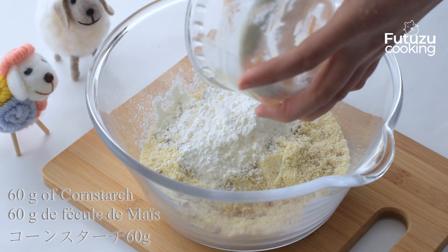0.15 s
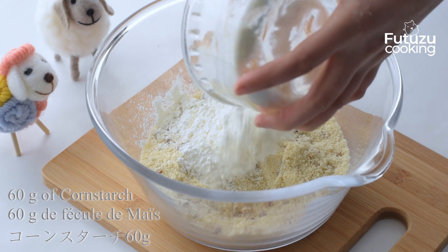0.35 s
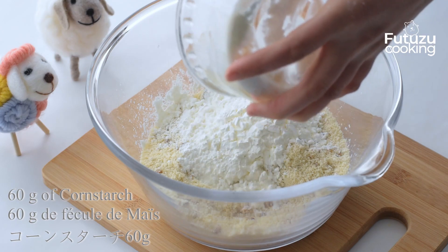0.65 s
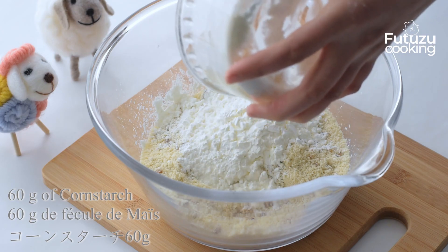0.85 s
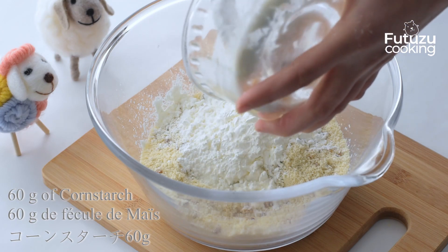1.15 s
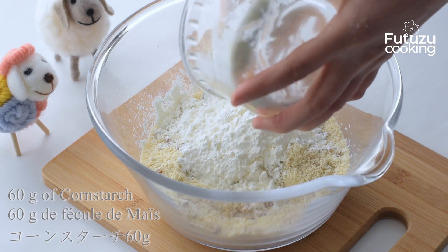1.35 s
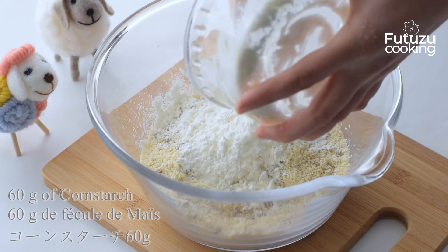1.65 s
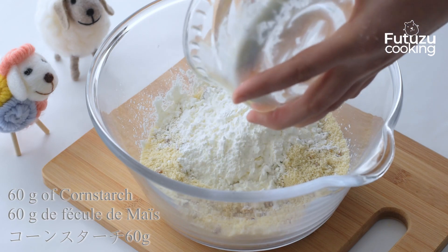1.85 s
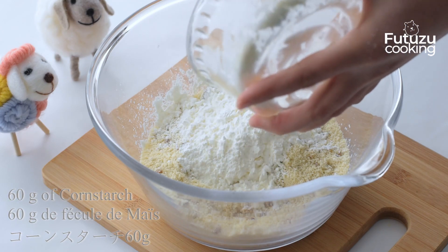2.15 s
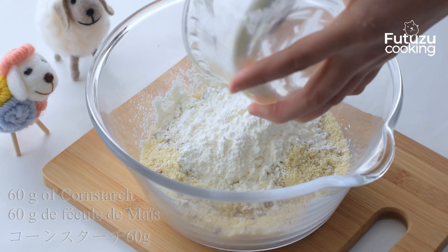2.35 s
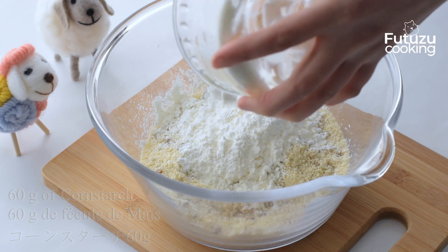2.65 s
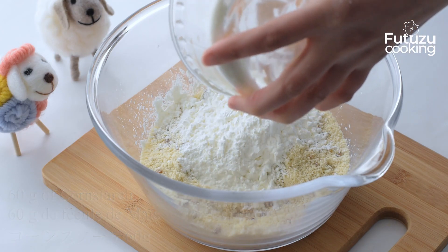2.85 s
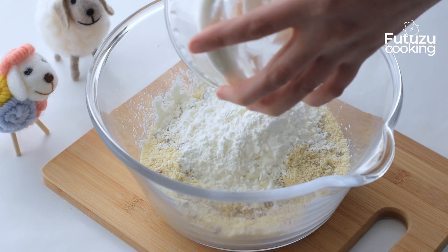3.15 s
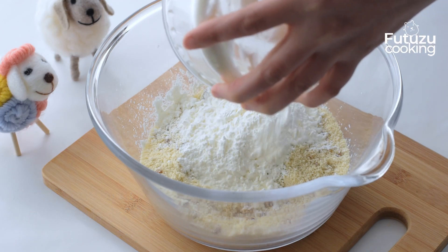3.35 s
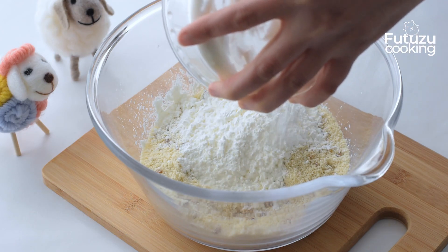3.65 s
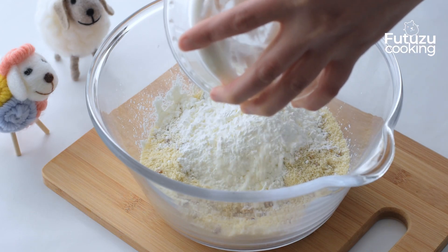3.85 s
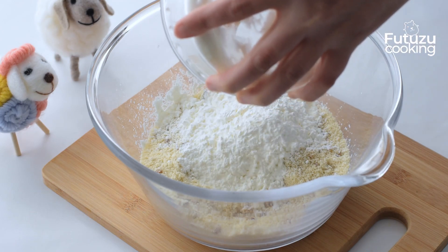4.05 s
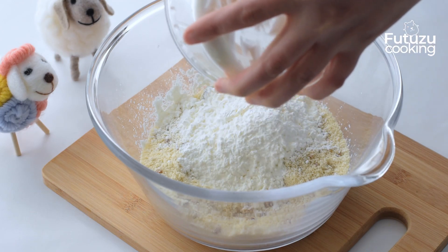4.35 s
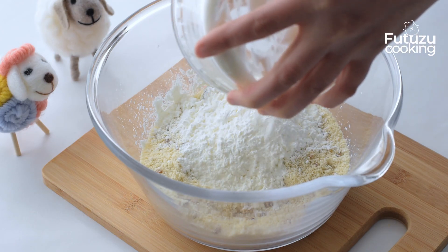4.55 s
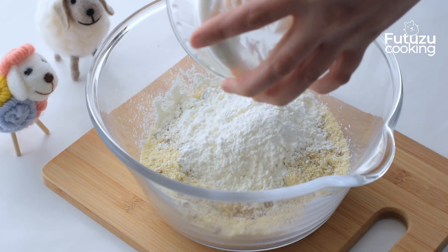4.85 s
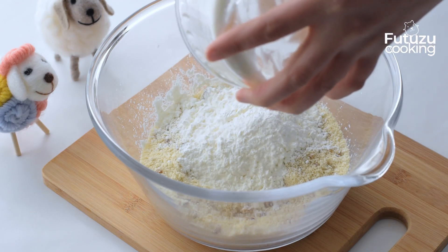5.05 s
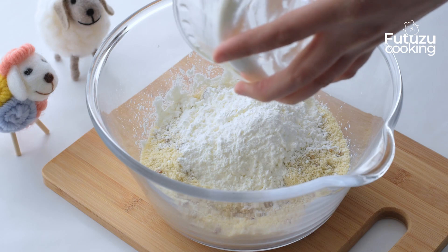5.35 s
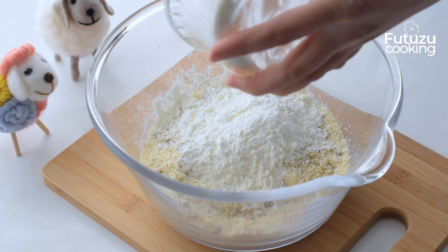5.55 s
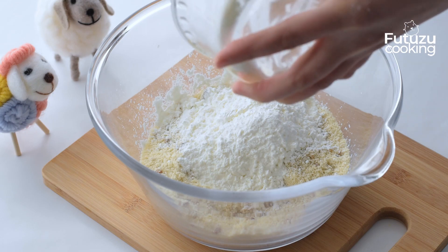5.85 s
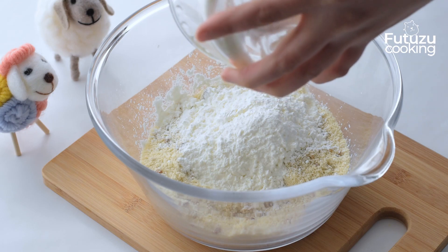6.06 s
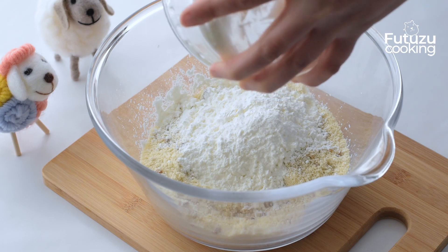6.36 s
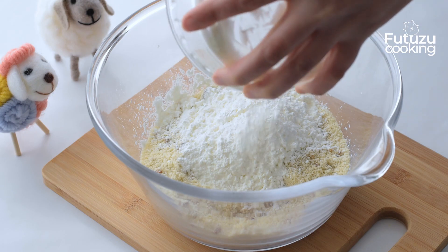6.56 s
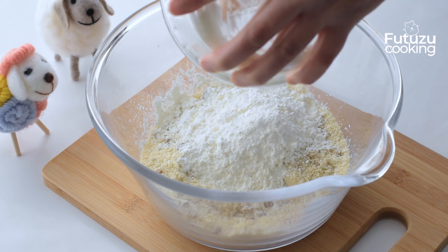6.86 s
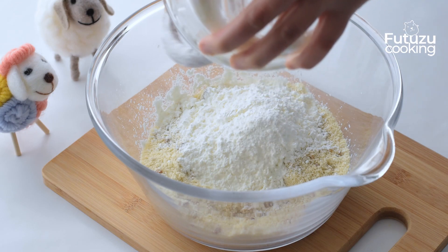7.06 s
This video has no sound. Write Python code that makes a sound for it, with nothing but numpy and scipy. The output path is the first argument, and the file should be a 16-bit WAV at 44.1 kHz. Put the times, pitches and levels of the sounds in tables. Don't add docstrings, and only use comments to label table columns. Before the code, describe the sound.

Near the microphone, wood meets glass with dull knocks, faint scrapes and short, damped rings, the strongest bright clinks arriving late. The kitchen answers briefly. Outside, a rising trill accelerates during the opening, then another song of quick swooping whistles and chirps follows with airy echoes. Low distant traffic, slight floor rumble and light microphone hiss lie underneath.

```python
import sys
import numpy as np
from scipy import signal
from scipy.fft import rfft, irfft, next_fast_len
from scipy.io import wavfile
from scipy.ndimage import uniform_filter1d, map_coordinates

SR = 44100
rng = np.random.default_rng(int(sys.argv[2]) if len(sys.argv) > 2 else 0)


def amplitude_ratio(level_db):
    exponent = np.asarray(level_db, float) / 20
    return 10 ** exponent


def bounce(signal):
    frames = np.transpose(np.atleast_2d(signal))
    limited = np.clip(frames, -1, 1)
    pcm = np.round(limited * 32767).astype(np.int16)
    wavfile.write(sys.argv[1], SR, pcm)


N = 317520

# start in seconds, peak in dB, low edge in Hz,
# high edge in Hz.
KNOCKS = [(0.0634, -16, 305, 1030), (.108, -18.5, 358.7, 1450), (0.541, -41, 250, 704),
          (1.175, -35, 700, 1720), (1.83, -26.5, 585, 1780), (2.389, -13, 840, 2660),
          (2.852, -23, 302, 1010), (3.04, -25.5, 200, 1100), (3.491, -22.5, 250, 1500),
          (4.372, -32.5, 600, 1900), (4.785, -22, 150, 1250), (5.2265, -4, 1330, 5400),
          (5.224, -51, 100, 457), (5.956, -29, 1200, 2100), (6.079, -41.5, 150, 500),
          (6.168, -10.5, 1100, 2490), (6.828, -5, 760, 3740)]
# pitch in Hz, width in Hz, level in dB.
SPOON = [(500, 150, -6), (983, 71, -82.5), (1421.6, 1100, 11), (2050, 500, -5), (3050, 400, -16.5)]
# start in seconds, level in dB,
# tilt in dB per octave, pitch factor under the grip, seconds until the fingers close.
RINGS = [(0.11, -23, -18.5, 1.005, 0.017), (.11, -26.5, -27, .93, 0.035), (1.176, -25, -22, 0.98, 0.0077),
         (1.194, -30, -27, .99, 0.039), (1.831, -23.5, -22.5, .993, 0.044), (2.4, -14.5, -23, 0.97, 0.013),
         (2.436, -35, -24, 0.95, 0.03), (3.042, -36.5, -13, 0.98, 0.026), (3.493, -20.5, -23, 0.985, 0.027),
         (4.37, -20, -36, 0.99, 0.03), (5.225, -11, -1.8, 1, 0.021), (5.955, -33.5, -14.5, 1.02, 0.013),
         (6.168, -7.5, -21.5, 1, 0.023), (6.197, -22, -28.5, 1.001, 0.023),
         (6.828, -7.5, -11.5, 1.008, 0.0085)]
# start in seconds, level in dB, favoured Hz,
# pitch factor under the grip, seconds until the fingers close.
SPOT_RINGS = [(1.832, -58, 2700, 1.1, 0.069), (2.409, -35.5, 2700, .99, 0.044),
              (5.228, -22, 4650, .996, 0.052), (6.831, -17.5, 4650, 1.006, 0.029)]
# pitch in Hz, split in Hz, level of the partner
# in dB, seconds to fall 60 dB in the hand.
DISH_MODES = [
    (1199.3, 13, -14.5, 0.2),
    (2700, 23, -7, 0.27),
    (4650, 55, -2, 0.11),
]
# start in seconds, length in seconds, level in dB, favoured Hz.
GRAZES = [(3.038, 0.0053, -64, 6500), (3.41, .11, -70, 6930), (4.14, 0.018, -66, 5200),
          (4.161, 0.027, -54, 5100), (4.368, .01, -74, 6900), (4.96, 0.063, -70, 4620),
          (5.228, 0.018, -58.5, 5012), (6.519, 0.036, -53.5, 4950), (6.827, 0.0031, -32.5, 4230)]
# pitch in Hz, width in Hz.
HIGH_RIM = [(3972, 17), (4620, 47), (6930, 84)]
# frequency in Hz, seconds to fall 60 dB.
KITCHEN = [(200, 0.081), (1200, 0.29), (4000, 0.32), (10000, 0.1)]

# time in seconds, start in Hz,
# top in Hz, bend (a plain power), level in dB.
TRILL = [(.04, 6720, 8150, 0.24, -51), (.57, 4130, 7830, 0.38, -49), (1.7, 3876, 7550, 0.86, -44.5),
         (2.1, 3780, 7390, 0.89, -45), (2.44, 3810, 7030, 0.85, -50)]
# time in seconds, syllables sung so far.
TRILL_PACE = [(.04, 0), (.22, 1), (.35, 2), (1.0, 8), (1.29, 11), (1.53, 14), (2.44, 27)]
# frequency in Hz, seconds to fall 60 dB.
HEDGE = [(4000, 1), (9000, 0.77)]

# start in seconds, length in seconds,
# start in Hz, end in Hz, level in dB. The next three tables have the same columns.
SWOOPS = [(4.746, .1, 7250, 7430, -50.5), (4.933, 0.081, 6900, 7164, -46)]
# start and length in seconds, start and end in Hz, dB.
DIVES = [(5.195, 0.048, 4730, 4550, -44), (5.452, .036, 7700, 7150, -44.5), (5.72, .055, 4375, 3960, -41.5),
         (6.18, 0.14, 4680, 4755, -43)]
# start and length in seconds, start and end in Hz, dB.
FLICKS = [(4.1, .16, 3340, 3410, -51.5), (5.553, .021, 7940, 7400, -47), (5.775, .047, 4690, 4375, -43.5),
          (5.83, .08, 4164, 3970, -46.5)]
# start and length in seconds, start and end in Hz, dB.
GLIDES = [(.75, 0.16, 2092, 2216, -66), (4.184, .006, 11700, 9500, -56), (4.275, 0.054, 3420, 3570, -58),
          (4.365, 0.017, 2640, 2630, -59), (4.48, .1, 3860, 3880, -64), (4.53, 0.047, 2750, 2580, -60),
          (4.755, 0.096, 7800, 7950, -51.5), (5.33, .1, 3800, 5020, -53), (5.49, 0.026, 5870, 6200, -57.5),
          (5.497, 0.025, 8040, 8900, -44), (5.525, 0.017, 8900, 7750, -41), (5.62, .18, 3050, 2850, -66.5),
          (5.635, .045, 5400, 4500, -52.5), (5.638, 0.02, 5440, 7470, -51.5),
          (6.028, 0.18, 4030, 4050, -56), (6.082, .05, 5950, 5700, -56), (6.31, .042, 4050, 3100, -52.5),
          (6.19, 0.034, 5300, 4440, -47), (6.36, 0.05, 3690, 2880, -55), (6.485, 0.026, 3770, 3620, -42),
          (6.52, 0.04177, 3710, 4200, -46), (6.6, 0.21, 3200, 2795, -62), (6.63, 0.053, 3990, 3700, -56),
          (7.02, 0.021, 3150, 3440, -54.5), (7.03, 0.153, 1800, 2000, -69)]
# frequency in Hz, seconds to fall 60 dB.
GARDEN = [(2000, 1), (5000, 1), (9000, 0.7)]

# time in seconds, level in dB.
STREET = [(0, -51), (1.56, -51), (1.94, -49.5), (4.47, -50.5), (4.83, -50), (5, -50), (7.2, -50.5)]
# frequency in Hz, level in dB per Hz.
HUSH = [(59, -30.5), (100, -16), (267, -12.5), (774, -3.5), (1370, -12), (2170, -22.5), (5000, -30.5),
        (6500, -68)]
# frequency in Hz, left-right likeness from 0 to 1.
ALIKE = [(100, 1), (300, 0.53), (1400, 0.59), (4000, 0.45)]
# frequency in Hz, left minus right in dB.
LEAN = [(60, 4), (110, 0.5), (250, -1.5), (700, 1), (1800, 1.5), (4400, 2.5), (8120, 0)]
# frequency in Hz, level in dB per Hz.
RUMBLE = [(20, -0.5), (50, 13.5), (90, 3), (160, -26)]
# time in seconds, level in dB, half-width in seconds.
THUMPS = [(0, -57, 0.053), (.55, -55.5, .09), (2.3, -67, .07), (3.9, -70, .06), (5.24, -51, 0.022),
          (6.68, -69, .07)]
# start in seconds, end in seconds, level in dB.
INSECT = [
    (.3, 2.9, -73),
    (4.9, 5.4, -74),
]
# frequency in Hz, level in dB per Hz.
HISS = [(500, -3), (2000, 4), (8000, 3), (16000, -0.5)]

ROOM_DB_PER_KHZ = 1.04
FREE_LONGER = 1.53
CLOSE_DB, CLOSE_S = -9, 0.0022
SWOOP, SWOOP_S = 0.2, 0.005
FLICK, FLICK_S = 0.2, 0.003
HOOK_DB = -35
DIVE_DB, SWELL_DB, GLIDE_DB = -20, 12.5, -3


def unit(x):
    return x / np.sqrt(np.mean(x ** 2) + 1e-20)


def along(points, hz):
    f, v = np.transpose(points)
    return np.interp(np.log(hz + 1), np.log(f + 1), v)


def wobble(rate, size=N):
    knots = rng.standard_normal(int(size * rate / SR) + 4)
    return map_coordinates(knots, [np.arange(size) * rate / SR])


def filtered(x, response):
    m = next_fast_len(x.shape[-1] + 4096)
    return irfft(rfft(x, m) * response(np.fft.rfftfreq(m, 1 / SR)), m)[..., :x.shape[-1]]


def resonance(f, hz, width_hz):
    return 1j * f * width_hz / (hz * hz - f * f + 1j * f * width_hz)


def rush(spectrum, alike):
    def shares(hz):
        angle = np.arccos(np.clip(along(alike, hz), -1, 1)) / 2
        return amplitude_ratio(along(spectrum, hz)) * [np.cos(angle), np.sin(angle)]

    mid, side = filtered(rng.standard_normal((2, N)), shares)
    return unit(np.array([mid + side, mid - side]))


def echoes(x, decays, wide, size):
    hz, t, z = signal.stft(rng.standard_normal((2, size)), SR, nperseg=256)
    fading = amplitude_ratio(-60 * t / along(decays, hz)[:, None])
    mid, side = signal.istft(z * fading, SR, nperseg=256)[1]
    tail = np.array([mid + wide * side, mid - wide * side]) / np.linalg.norm(mid)
    return signal.fftconvolve(x[None], tail, axes=1)


def add(out, s, x):
    at = round(s * SR)
    out[:, at:at + x.shape[1]] += x[:, :out.shape[1] - at]


def in_kitchen(x, wet_db):
    wet = echoes(np.pad(x, (200, 0)), KITCHEN, wide=0.013, size=SR // 3)
    return amplitude_ratio(wet_db) * wet + np.pad(x, (0, wet.shape[1] - len(x)))


def wood(f):
    body = 0
    for k, (hz, width_hz, db) in enumerate(SPOON):
        body = body + (-1) ** k * amplitude_ratio(db) * resonance(f, hz, width_hz) * 900 / width_hz
    return 1 + 0.5 * body


def knocks():
    out, t = np.zeros((2, N)), np.arange(SR // 8) / SR
    for s, db, low_hz, high_hz in KNOCKS:
        def contact(f):
            low_cut = (1j * f / (low_hz + 1j * f)) ** 2
            return low_cut / (1 - (f / high_hz) ** 2 + 1.2j * f / high_hz) ** 3

        push = (t == 0) + 0.082 * amplitude_ratio(-60 * t / 0.047) * rng.standard_normal(len(t))
        thud = filtered(push, lambda f: contact(f) * wood(f))
        crack_db = -57.5 + 7.5 * high_hz / 1000
        crack = rng.standard_normal(len(t)) * amplitude_ratio(crack_db - 2 - 60 * t / 0.012)
        crack = filtered(crack, lambda f: resonance(f, 6500, 7000))
        blow = thud / abs(thud).max() + crack
        add(out, s - 0.001, amplitude_ratio(db) * in_kitchen(blow, -7.5 + ROOM_DB_PER_KHZ * high_hz / 1000))
    return out


def dish():
    out, t = np.zeros((2, N)), np.arange(SR // 3) / SR
    blows = [(s, db, DISH_MODES[0][0], tilt_db, *hand) for s, db, tilt_db, *hand in RINGS]
    blows += [(s, db, hz, -45, *hand) for s, db, hz, *hand in SPOT_RINGS]
    for s, top_db, favoured_hz, tilt_db, grip, free in blows:
        age = np.minimum(t, free) / FREE_LONGER + np.maximum(t - free, 0)
        ring = np.zeros(len(t))
        for hz, split_hz, partner_db, t60 in DISH_MODES:
            db = top_db + tilt_db * abs(np.log2(hz / favoured_hz))
            main = np.sin(2 * np.pi * grip * hz * t)
            partner = amplitude_ratio(partner_db) * np.sin(2 * np.pi * (grip * hz - split_hz) * t)
            ring += amplitude_ratio(db - 60 * age / t60) * (main + partner)
        muted = amplitude_ratio(CLOSE_DB * np.clip((t - free) / CLOSE_S, 0, 1))
        swell = 1 - np.exp(-t / 0.001)
        add(out, s - 0.001, amplitude_ratio(-2) * in_kitchen(ring * muted * swell, wet_db=-8.5))
    return out


def grazes():
    out = np.zeros((2, N))
    for s, length, top_db, favoured_hz in GRAZES:
        t = np.arange(round(SR * length) + SR // 8) / SR
        stroke = (t < length) * rng.standard_normal(len(t))
        ring = np.zeros(len(t))
        for hz, width_hz in HIGH_RIM:
            db = top_db - 36 * abs(np.log2(hz / favoured_hz))
            ring += amplitude_ratio(db) * unit(filtered(stroke, lambda f: resonance(f, hz, width_hz)))
        add(out, s, in_kitchen(ring, wet_db=-4.5))
    return out


def trill():
    out, u = np.zeros((2, N)), np.linspace(0, 1, SR // 26)
    beat_s, sung = np.transpose(TRILL_PACE)
    s, *shape = np.transpose(TRILL)
    for onset in np.interp(np.arange(sung[-1] + 1), sung, beat_s):
        start_hz, top_hz, bend, db = (np.interp(onset, s, column) for column in shape)
        pitch = start_hz + (top_hz - start_hz) * u ** bend + 200 * wobble(612, len(u))
        voice = amplitude_ratio(db) * np.sqrt(np.sin(np.pi * u)) * np.sin(2 * np.pi * np.cumsum(pitch) / SR)
        add(out, onset - 0.005, 0.29 * voice[None])
        add(out, onset - 0.005, echoes(voice, HEDGE, wide=0.23, size=SR // 2))
    return out


def songs():
    out = np.zeros((2, N))
    kinds = [(SWOOPS, SWOOP, FLICK, 0), (DIVES, SWOOP, 0, DIVE_DB),
             (FLICKS, 0, FLICK, SWELL_DB), (GLIDES, 0, 0, GLIDE_DB)]
    for notes, swoop, flick, change_db in kinds:
        for s, length, start_hz, end_hz, db in notes:
            t = np.arange(0, length, 1 / SR)
            ends = np.clip(np.minimum(t, length - t) / 0.0018, 0, 1)
            hooks = 1 + swoop * np.exp(-t / SWOOP_S) - flick * np.exp((t - length) / FLICK_S)
            glide = start_hz + (end_hz - start_hz) * t / length
            pitch = glide * hooks + 55 * wobble(202, len(t))
            change = change_db * (t / length - (change_db > 0))
            level_db = db + HOOK_DB * abs(hooks - 1) + change + 3.5 * wobble(44, len(t))
            voice = amplitude_ratio(level_db) * ends * np.sin(2 * np.pi * np.cumsum(pitch) / SR)
            wet = echoes(np.pad(voice, (300, 0)), GARDEN, wide=0.38, size=SR * 3 // 5)
            add(out, s, amplitude_ratio(4) * wet + 1.39 * np.pad(voice, (0, wet.shape[1] - len(voice))))
            add(out, s + 0.12, amplitude_ratio(-20) * voice[None])
    return out * amplitude_ratio([[-1.1], [1.1]])


def insect():
    t = np.arange(N) / SR
    chirr = filtered(rng.standard_normal(N), lambda f: resonance(f, 3945, 120) ** 2)
    bouts = amplitude_ratio(-80) + sum(amplitude_ratio(db) * (t > start) * (t < end) for start, end, db in INSECT)
    bouts = uniform_filter1d(bouts, size=SR // 4)
    return bouts * amplitude_ratio(-1 + 3.6 * wobble(9)) * unit(chirr)


def street():
    s, db = np.transpose(STREET)
    level_db = np.interp(np.arange(N) / SR, s, db)
    hush = amplitude_ratio(level_db + 1.5 + 0.67 * wobble(9.8)) * rush(HUSH, ALIKE)
    return filtered(hush, lambda hz: amplitude_ratio(along(LEAN, hz) * [[0.5], [-0.5]]))


def rumble():
    t = np.arange(N) / SR
    level = amplitude_ratio(-71) + sum(amplitude_ratio(db) * np.exp(-((t - s) / half) ** 2) for s, db, half in THUMPS)
    return level * amplitude_ratio(2.2 * wobble(9)) * rush(RUMBLE, [(50, 1.0)])


def scene():
    return knocks() + dish() + grazes() + trill() + songs() + insect() + street() + rumble()


def low_pass(x):
    return signal.sosfilt(signal.butter(12, 16440, fs=SR, output="sos"), x)


def record(dry):
    hot = dry + amplitude_ratio(-58.5) * rush(HISS, [(1000, 0.36)])
    soft = hot / (1 + abs(hot / 0.58) ** 4) ** (1 / 4)
    mix = filtered(soft, lambda hz: hz < 15800) - 0.0043
    return low_pass(mix)


dry = scene()
out = record(dry)
bounce(out)
```